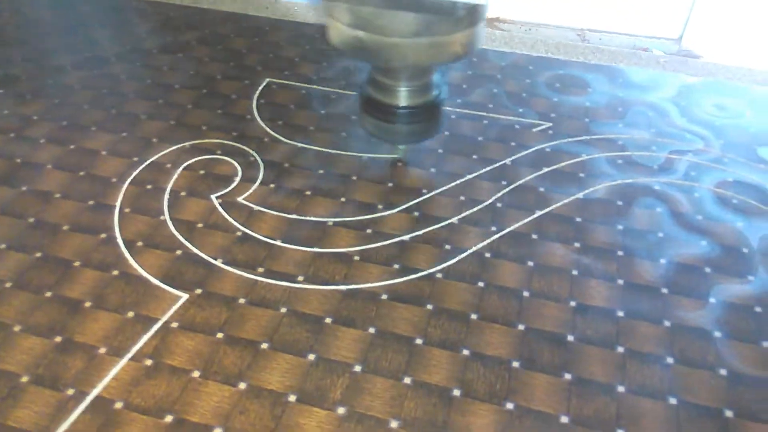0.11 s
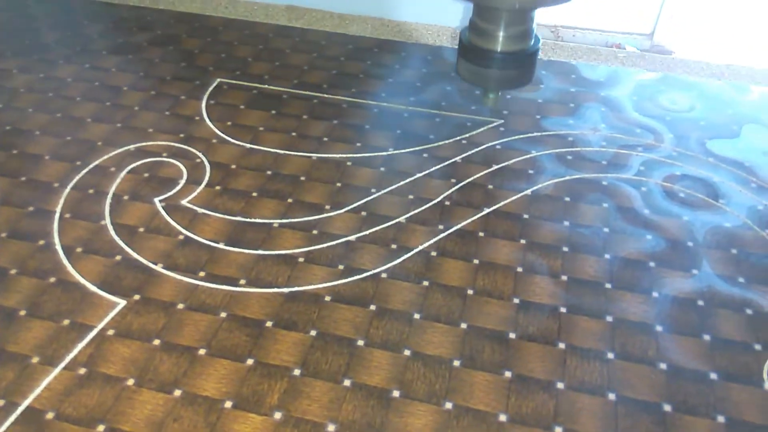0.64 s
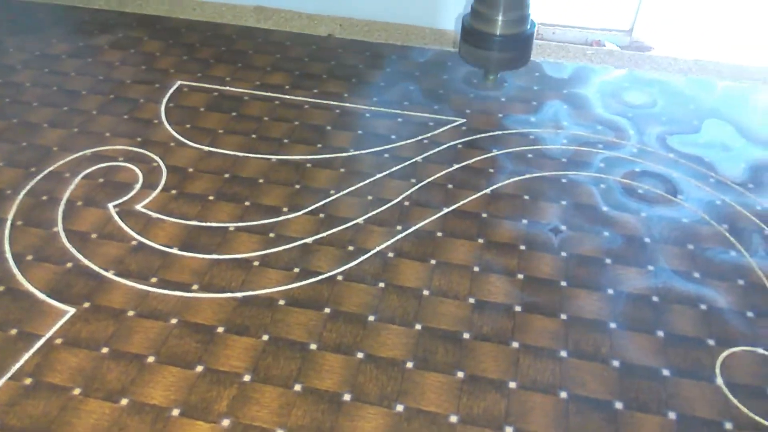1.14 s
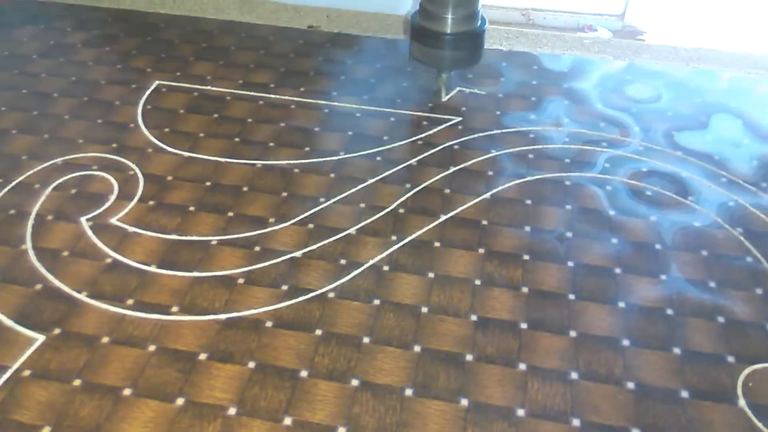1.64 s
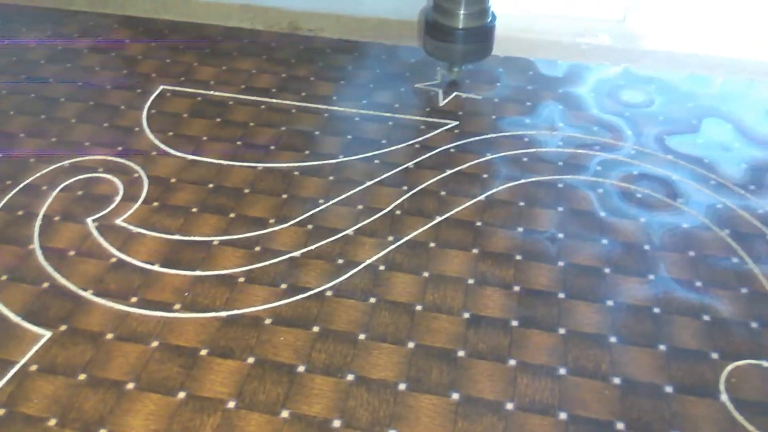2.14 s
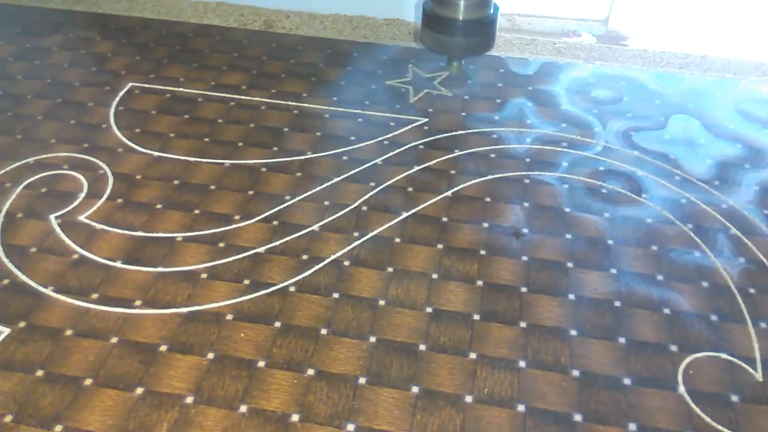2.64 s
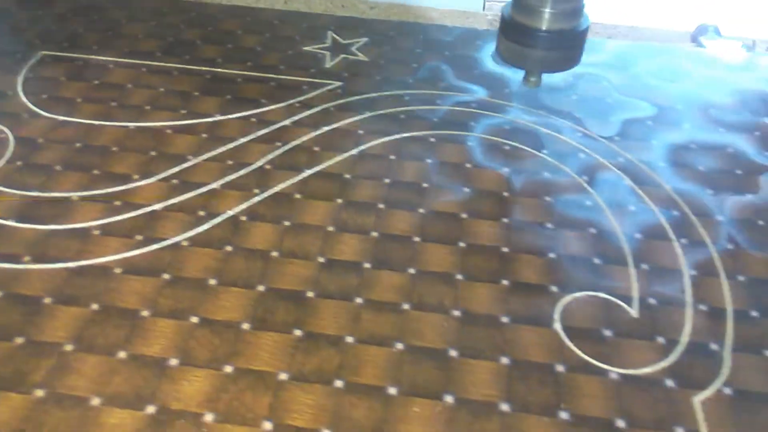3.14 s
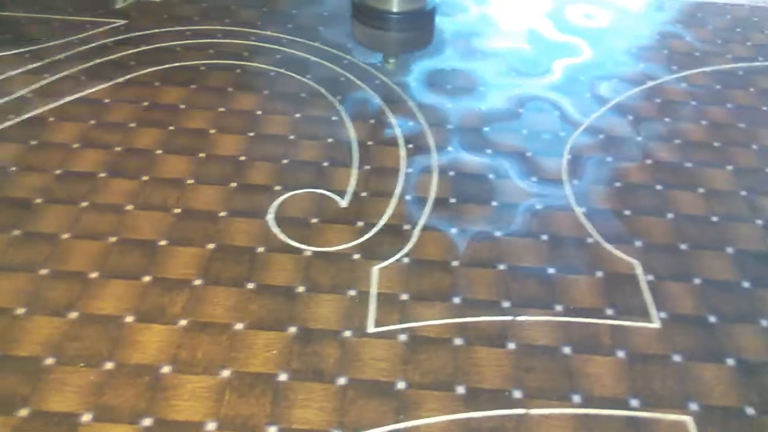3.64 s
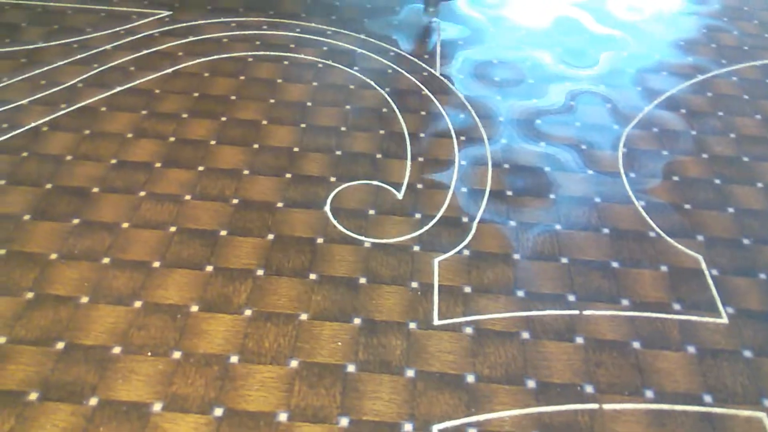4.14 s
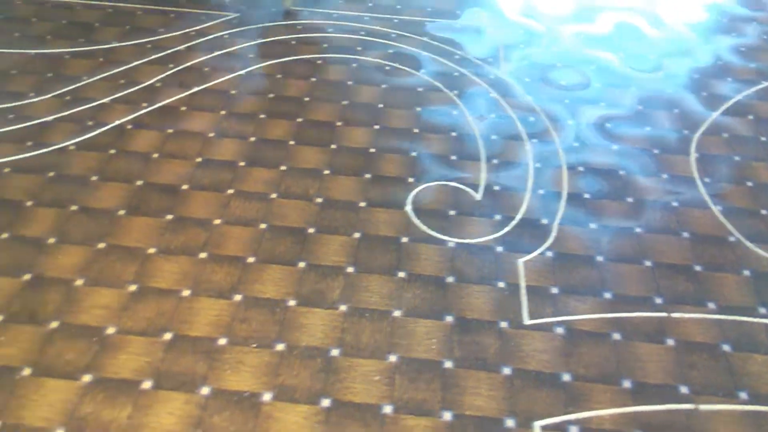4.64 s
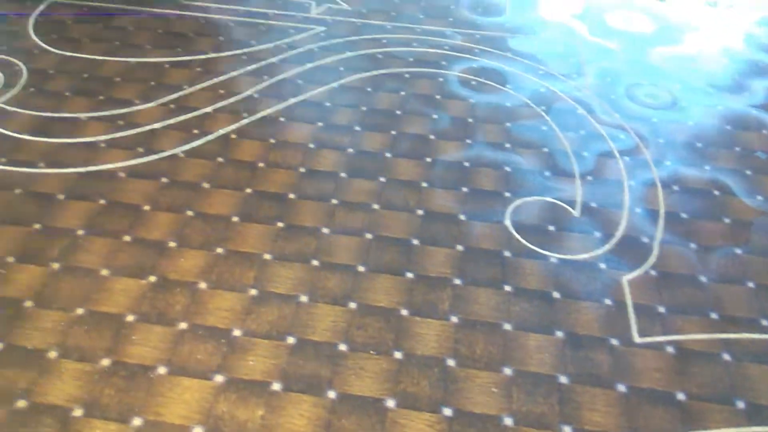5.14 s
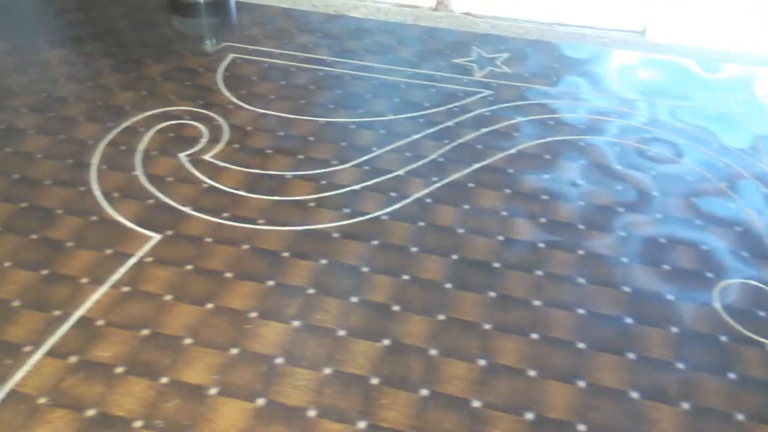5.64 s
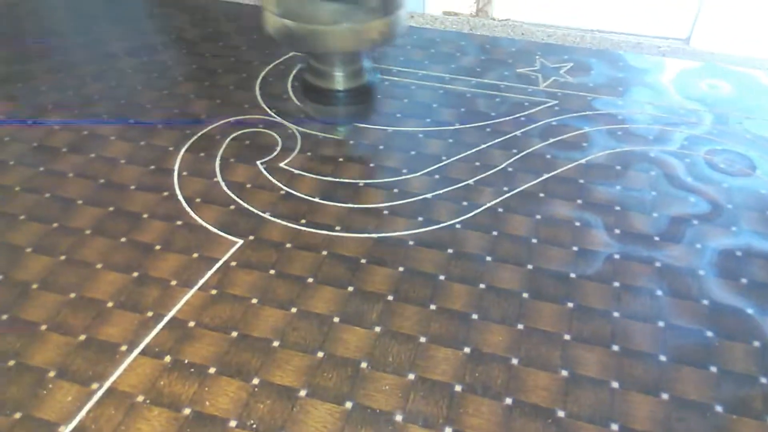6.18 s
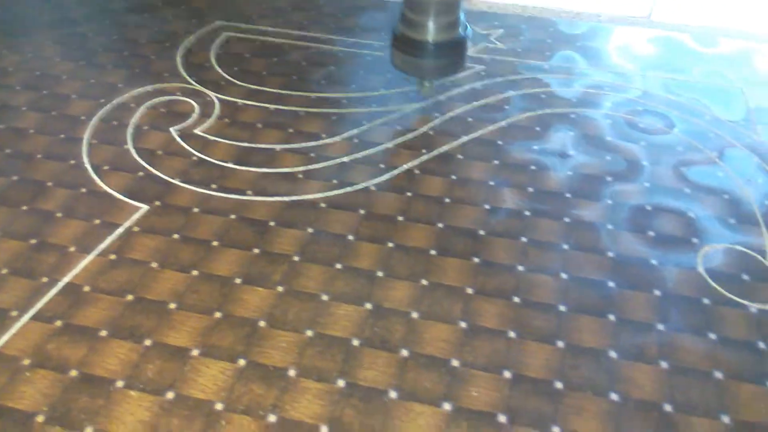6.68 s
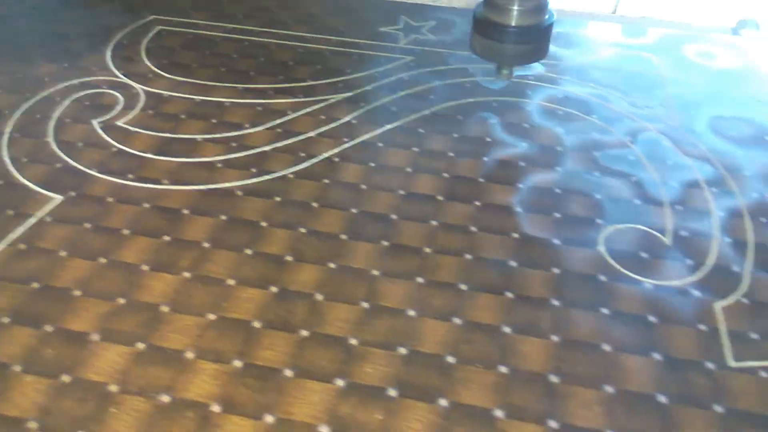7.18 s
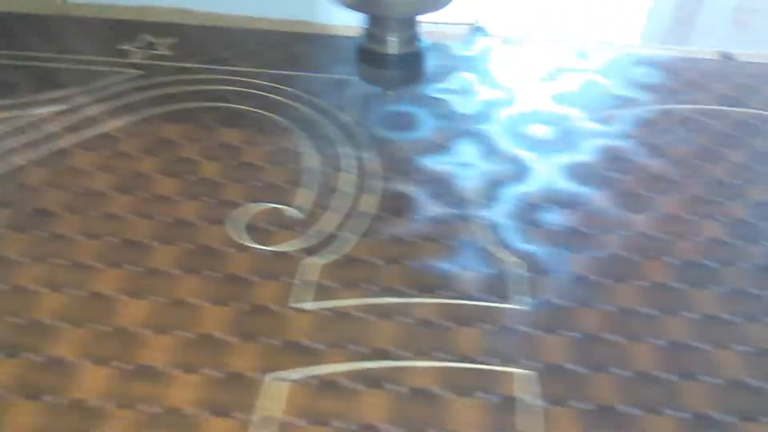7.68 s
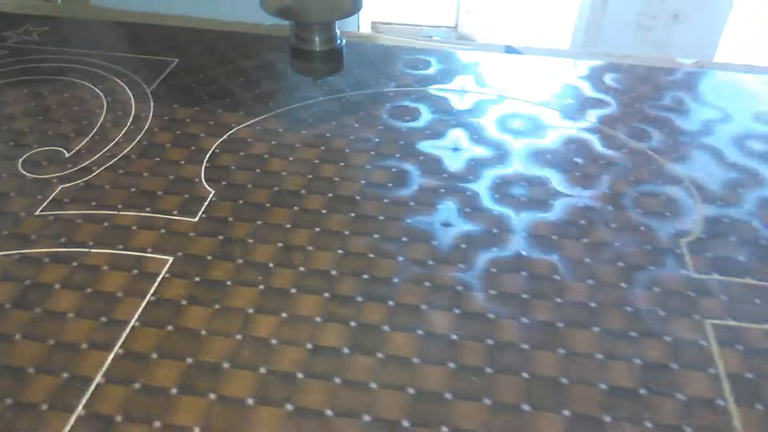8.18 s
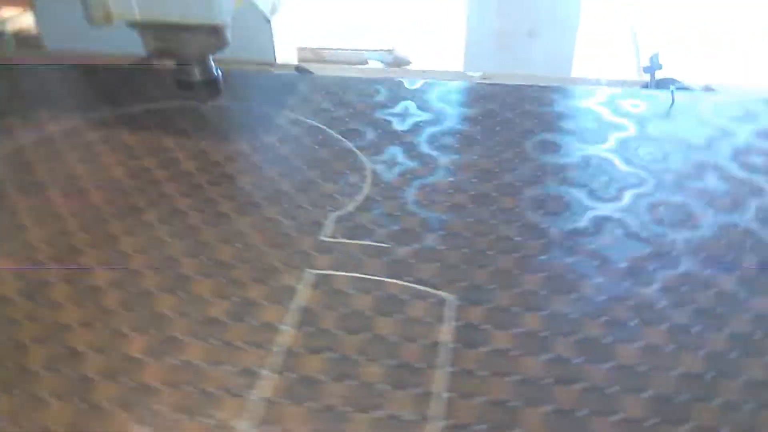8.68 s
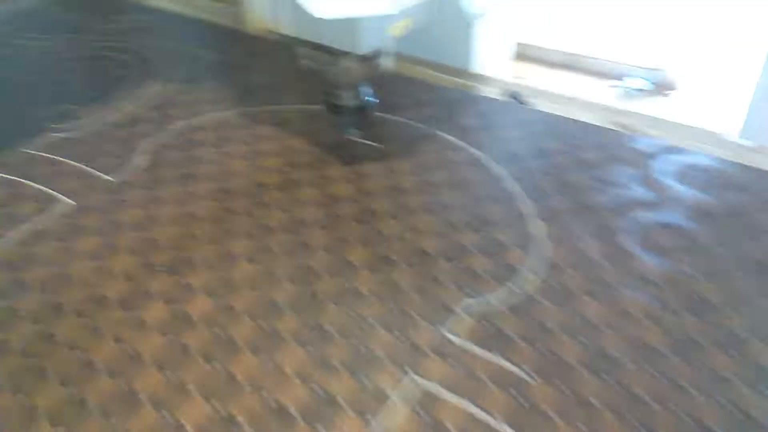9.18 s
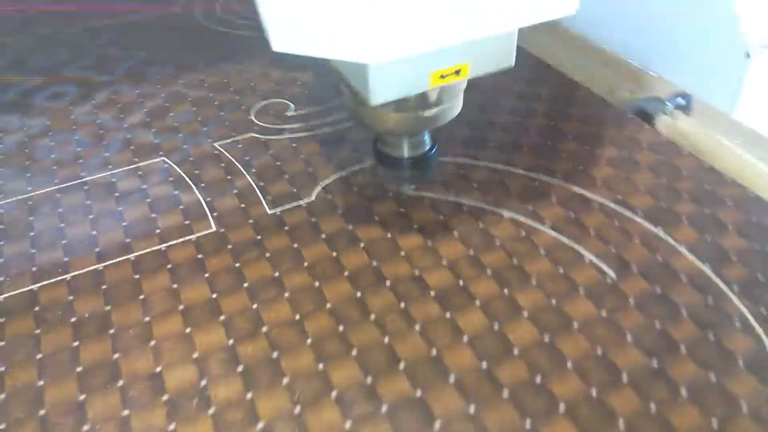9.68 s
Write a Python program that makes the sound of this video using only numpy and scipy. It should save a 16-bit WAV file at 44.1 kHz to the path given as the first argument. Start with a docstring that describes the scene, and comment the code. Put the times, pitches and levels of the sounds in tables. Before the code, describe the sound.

Close to a machine router in a workshop, a broad, bright hiss of rushing air dominates without pause. A thin, steady spindle whine pierces it at constant pitch, its overtones swelling and fading. Soon the whine throbs in quick short strokes, then smooths out. Feed motors hum softly underneath. The hiss changes colour as the head and handheld microphone move, with short early reflections and no long echo.

```python
"""A router spindle whines through a broad hiss as it cuts shallow grooves into a board in a workshop.
The whine sums sines on multiples of one rotation; short strokes of the cutter make its second multiple throb.
Air rushing round the cutter is noise shaped by the resonances of the head, and its colour shifts as head and
microphone move about. Feed motors hum as narrow-band noise; a low fan tone and a rumble lie beneath."""
import sys
import numpy as np
from scipy import signal
from scipy.fft import rfft, irfft
from scipy.io import wavfile
from scipy.ndimage import map_coordinates

SR = 44100
rng = np.random.default_rng(int(sys.argv[2]) if len(sys.argv) > 2 else 0)


def gain_from_db(level_db):
    """Turn a decibel level (scalar or array-like) into a linear amplitude factor."""
    decades = np.asarray(level_db, float) / 20
    return 10 ** decades


def master(y):
    """Save y as 16-bit WAV."""
    cut = np.clip(np.atleast_2d(y).T, -1, 1)
    pcm = np.round(cut * 32767)  # scale
    wavfile.write(sys.argv[1], SR, pcm.astype(np.int16))


N = 432606
TIME = np.arange(N) / SR  # s
FREQS = np.fft.rfftfreq(N, 1 / SR) + 1e-3  # Hz, kept above zero for the logarithm

# Colour of the workshop rumble, relative within a band: [pitch_hz, density_db_per_hz]
RUMBLE_COLOUR = [(12, -60), (20, -27), (97, -27), (154, -13), (198, -13.5), (251, -8.5), (318, -9.5),
                 (577, -7), (669, -5), (700, -4.5), (910, -44), (1540, -120)]
# Borders between rumble bands: [pitch_hz]
RUMBLE_BORDERS = [102]
# Rumble bands, low to high: [mean_level_db, turning_share (ratio), drawing_off_share (ratio)]
RUMBLE_LEVELS = [(-67.5, -.3, 1.1), (-43, 0.05, 1)]
# Stretches where the fan hum is heard: [start_s, end_s, level_db]
FAN_STRETCHES = [(-.1, .75, -53), (1.5, 2.15, -57), (2.45, 2.73, -51), (3.7, 3.8, -54), (4.0, 6.4, -54),
                 (6.65, 6.85, -51), (7.2, 7.65, -61), (7.92, 8.35, -54), (8.35, 8.7, -48.5),
                 (9.1, 9.75, -52.5)]
# Feed motor tones: [start_s, end_s, pitch_hz, width_hz, level_db]
FEED_TONES = [(.78, .96, 685, 8, -39), (.95, 1.3, 150, 16, -57.5), (0.92, 1.3, 330, 43, -46.5),
              (2.55, 2.75, 310, 55, -45), (2.8, 3.3, 680, 2, -42.5), (3.45, 3.85, 350.4, 35, -45.5),
              (3.496, 3.9, 587, 3, -43), (4.297, 5.1, 159, 23, -51.5), (5.1, 6, 159, 35, -53),
              (6.65, 6.85, 320, 60, -49), (2, 2.63, 145, 28, -59.5), (8.65, 8.9, 163, 20, -53),
              (8.647, 8.9, 355, 15, -49), (8.695, 9.098, 423, 47, -43), (9.1, 9.798, 171, 23, -51),
              (3.45, 3.85, 155, 30, -55), (5.1, 5.5, 360, 80, -49.5), (6.0, 7.1, 80, 50, -67)]
# Colour of the roar of head and board, relative within a band: [pitch_hz, density_db_per_hz]
ROAR_COLOUR = [(350, -55), (600, -13), (685, -14), (743, -4.5), (848, -3.5), (1020, 0), (1350, -5),
               (1740, -2.5), (2050, -8.5), (2320, -7.5), (2730, -9), (3050, -1), (4720, -4), (5720, -5),
               (6800, -8.5), (8840, -48), (15000, -120)]
# Resonances and dips of the roar: [pitch_hz, width_hz, lift_db]
ROAR_RESONANCES = [(970, 420, -1), (1748, 110, 4), (2290, 180, 2.5), (3000, 240, 0.5), (3850, 150, 1.5),
                   (4994, 57, 5.5), (5730, 570, 7.5)]
# Borders between roar bands: [pitch_hz]
ROAR_BORDERS = [1510, 2640]
# Roar bands, low to high: [mean_level_db, turning_share (ratio), drawing_off_share (ratio)]
ROAR_LEVELS = [(-35, 0.068, 0.09), (-30.5, -0.046, .1), (-26, -0.17, 0.24)]
# Colour of the air hiss at the cutter, relative within a band: [pitch_hz, density_db_per_hz]
HISS_COLOUR = [(3880, -30), (6600, -4), (6760, -11.5), (7360, 4), (7780, 4), (9770, 6.5), (10600, -0.5),
               (11900, -0.5), (12900, -7.5), (14600, -9), (15300, -9)]
# Resonances and dips of the hiss: [pitch_hz, width_hz, lift_db]
HISS_RESONANCES = [(7140, 450, 6), (8420, 170, 2), (8780, 310, 2.5), (10060, 230, 7), (11580, 300, -0.5),
                   (14600, 300, 1.5), (6670, 310, -6), (12000, 330, 0)]
# Borders between hiss bands: [pitch_hz]
HISS_BORDERS = [8460, 9510, 10660, 12470]
# Hiss bands, low to high: [mean_level_db, turning_share (ratio), drawing_off_share (ratio)]
HISS_LEVELS = [(-29, 0.4, 0.18), (-28.5, -0.054, 0.68), (-28, -0.47, 1.05), (-26.5, -0.16, 0.5),
               (-22, .99, .05)]
# The head turns its air stream to and from the microphone, and draws off; only departures from
# each column's mean count: [time_s, hiss_top_db, whole_rush_db]
HEAD_BEARING = [(0.0, -26, -18), (0.98, -22.5, -18.5), (1.06, -23.5, -18), (1.23, -24.5, -18.5),
                (1.94, -26.5, -18), (1.99, -27, -17.5), (3.22, -21.5, -19.5), (3.96, -26.5, -17),
                (4.51, -31.5, -18.5), (5.93, -28.5, -19.5), (6.39, -25.5, -17.5), (6.69, -23.5, -18.5),
                (7.38, -23.5, -19.5), (8.44, -27.5, -20.5), (8.58, -25.5, -20), (8.88, -30, -19.5),
                (9.4, -26.5, -21), (9.81, -26, -22)]
# Narrow bands of air that swell for a while (silent if they end before they start):
# [start_s, end_s, pitch_hz, width_hz, level_db]
AIR_SWELLS = [(-2, 0.38, 3800, 160, -34), (0, 1.2, 5000, 130, -37), (3, 3.6, 4600, 130, -39),
              (4.5, 6, 3400, 400, -35.5), (5.5, 6.5, 3790, 53, -37.5), (6.5, 8.7, 5030, 110, -37),
              (8, 9, 6200, 150, -36), (9, 9.6, 3470, 200, -36), (5, 7.2, 1750, 80, -37),
              (9, 10.1, 1300, 110, -37.5), (5, 5.5, 13000, 300, -39), (5, 6.8, 8150, 140, -34),
              (4.7, 6, 9100, 400, -40), (2, 6.1, 9500, 200, -35.5), (2, 1.2, 12000, 300, -36),
              (5, 5.2, 7250, 180, -32.5), (4.5, 6.1, 11200, 1000, -28), (1.5, 3.45, 11200, 900, -29),
              (6.2, 6.8, 10000, 500, -29), (7.5, 8.2, 1060, 110, -40), (0, 0.59, 12000, 540, -36),
              (1.0, 2.63, 9950, 480, -30), (1, 3.0, 8250, 400, -32), (3.5, 4.8, 8900, 600, -29.5),
              (7.5, 8.6, 7300, 500, -33), (8, 11, 13000, 900, -29), (7, 8.7, 4300, 400, -36.5),
              (3.5, 4.8, 14700, 1500, -33), (3.9, 5.0, 11000, 700, -35), (8, 7.6, 5000, 60, -42),
              (3.3, 3.95, 3870, 40, -44)]
# Reflections off board and gantry, relative to the direct path: [delay_s, level_db]
REFLECTIONS = [(.0017, -17), (.0029, -16), (.0043, -15), (.0061, -16), (.0087, -16), (.0127, -16)]
# Lowest tone of the whine as head and microphone move: [time_s, level_db]
FUNDAMENTAL_LEVEL = [(0.0, -32.5), (0.41, -37), (0.74, -34.5), (0.87, -43), (1.23, -35.5), (1.5, -42.5),
                     (1.86, -39.5), (1.88, -50), (1.99, -39), (2.08, -53), (2.7, -38.5), (2.79, -45),
                     (3.22, -35), (3.77, -35.5), (4.12, -43.5), (5.22, -35), (5.68, -42), (5.85, -33),
                     (6.23, -32.5), (6.45, -35.5), (8.44, -35), (8.63, -44), (9.07, -42), (9.1, -50),
                     (9.29, -35), (9.81, -35.5)]
# Higher tones of the whine: [multiple_of_rotation (ratio)]
WHINE_MULTIPLES = [2, 3, 4, 5, 6, 8, 16]
# Each higher multiple between its swells: [level_db]
FAINT_LEVELS = [-49, -54, -55, -58, -51, -54, -41]
# Stretches where a multiple stands out, one list per multiple: [start_s, end_s, level_db]
MULTIPLE_SWELLS = [
    [(-.1, .5, -32.5), (.56, 1.3, -36), (1.3, 2.5, -41), (2.5, 3.75, -37.5), (3.815, 4.11, -28),
     (4.17, 4.45, -28), (4.45, 5.3, -30.5), (5.3, 5.53, -36), (5.59, 6.07, -35), (6.2, 6.63, -34),
     (7.52, 7.75, -35.5), (7.75, 8.0, -44), (8.38, 8.67, -38.5), (9.1, 9.9, -36.5)],
    [(.2, .55, -37.5), (1.35, 1.5, -42), (1.7, 2.5, -47), (5.02, 5.4, -37.5), (5.4, 5.6, -34.5),
     (5.66, 5.95, -36.5), (6.4, 6.65, -39), (6.9, 7.2, -46)],
    [(-.1, .4, -41), (1.5, 2.45, -41), (3.8, 4.55, -41.5), (4.55, 4.9, -35.5), (4.9, 5.65, -39),
     (6.0, 6.65, -43), (9.05, 9.4, -45), (9.45, 9.68, -37), (9.68, 9.9, -42)],
    [(-.1, .55, -45), (2.15, 2.45, -45), (3.76, 4.06, -41), (5.0, 5.7, -45), (6.01, 6.3, -39),
     (6.5, 7.1, -52), (7.6, 7.75, -46)],
    [(-.1, .25, -44), (1.25, 2.4, -56), (2.8, 3.1, -47), (3.9, 5.62, -41.5), (5.63, 5.78, -35),
     (6.1, 6.45, -41), (9.05, 9.35, -41), (9.55, 9.9, -51)],
    [(3.45, 3.75, -49), (4.4, 5.2, -45), (8.7, 9.3, -47)],
    [(-.1, .25, -38), (1.4, 2.45, -42), (2.88, 3.42, -32), (4.3, 4.95, -39), (4.95, 5.27, -29.5),
     (5.33, 5.6, -31), (5.6, 6.3, -44), (6.5, 6.88, -36), (7.15, 7.72, -38), (7.8, 8.1, -33),
     (8.55, 8.92, -38), (9.07, 9.33, -35), (9.4, 9.7, -35), (9.7, 9.9, -28)],
]
# Strokes of the cutter in the second multiple: [start_s, length_s, peak_level_db]
CUTTER_STROKES = [(1.31, 0.14, -27), (1.445, .13, -23.5), (1.577, 0.14, -24.5), (1.70, 0.1, -24.5),
                  (1.8, 0.13, -27), (1.928, 0.14, -24.5), (2.048, .125, -26), (2.18, .11, -34.5),
                  (2.298, 0.12, -22.5), (2.435, 0.071, -27), (3.997, 0.28, -36), (4.133, 0.23, -32),
                  (5.6, .14, -30), (5.798, 0.073, -34), (5.994, .09, -28), (9.548, .2, -36)]


def rms_one(x):
    """Normalisation: scales to rms 1."""
    return x / np.sqrt(np.mean(x ** 2) + 1e-20)


def in_time(rows):
    """Linear interpolation: joins table rows by straight lines, one array per column."""
    time_s, *columns = np.transpose(rows)
    return [np.interp(TIME, time_s, column) for column in columns]


def drift(rate):
    """Slow random motion: normal knots of spread 1, rate per second, joined by straight lines."""
    knots = rng.standard_normal(400)
    return np.interp(TIME * rate, np.arange(len(knots)), knots)


def gate(start, end, fade_s):
    """Linear envelope: 1 between start and end, with straight fades centred on both."""
    return np.clip(np.minimum(TIME - start, end - TIME) / fade_s + .5, 0, 1)


def stretches(rows, fade_s):
    """Superposed envelopes: the height of a tone that stands out for a while in each row."""
    return sum(gain_from_db(level_db) * gate(start, end, fade_s) for start, end, level_db in rows)


def bell(hz, width_hz):
    """Resonance curve, 1 on top and one half at the edges of its width."""
    return 1 / (1 + (2 * (FREQS - hz) / width_hz) ** 2)


def hums(rows, fade_s):
    """Resonant filtering: narrow noise round each pitch, faded in and out."""
    out = np.zeros(N)
    white = rfft(rng.standard_normal(N))
    for start, end, hz, width_hz, level_db in rows:
        narrow = rms_one(irfft(white * bell(hz, width_hz), N))
        out += gain_from_db(level_db) * gate(start, end, fade_s) * narrow
    return out


def band_levels(bands, wander_db):
    """Directivity: each band follows the bearing of the head by its own shares and wanders slowly."""
    turn_db, off_db = (column - column.mean() for column in in_time(HEAD_BEARING))
    return [mean_db + turn_share * turn_db + off_share * off_db + wander_db * drift(2.493)
            for mean_db, turn_share, off_share in bands]


def rush(colour, resonances, borders_hz, levels_db, blend_hz, flicker_db):
    """Coloured noise: neighbouring bands of one spectrum swell and fade separately."""
    hz, db = np.transpose(colour)
    colour_db = np.interp(np.log(FREQS), np.log(hz), db, left=-120)
    for peak_hz, width_hz, lift_db in resonances:
        colour_db = colour_db + lift_db * bell(peak_hz, width_hz)
    noise = rfft(rng.standard_normal(N)) * gain_from_db(colour_db)
    # each band is the difference of two smooth steps in frequency
    above = [1] + [.5 + .5 * np.tanh((FREQS - border) / blend_hz) for border in borders_hz] + [0]
    out = np.zeros(N)
    for low, high, level_db in zip(above, above[1:], levels_db):
        band = rms_one(irfft(noise * (low - high), N))
        out += gain_from_db(level_db + flicker_db * drift(12)) * band
    return out


def workshop_rumble():
    """Low coloured noise: two bands whose levels vary apart."""
    levels_db = band_levels(RUMBLE_LEVELS, wander_db=1.35)
    return rush(RUMBLE_COLOUR, [], RUMBLE_BORDERS, levels_db, blend_hz=22, flicker_db=1.26)


def fan_hum():
    """Phase modulation: a low sine made slightly unsteady in phase and level."""
    pitch_hz, faint_db, waver_db = 246.5, -68, 3.0
    height = gain_from_db(faint_db) + stretches(FAN_STRETCHES, fade_s=.1)
    height = height * gain_from_db(waver_db * drift(12))
    return height * np.sqrt(2) * np.sin(2 * np.pi * pitch_hz * TIME + 1.7 * drift(11))


def feed_motors():
    """Forced resonance: each move of the gantry sets a frame resonance humming."""
    return hums(FEED_TONES, fade_s=0.11)


def head_roar():
    """Resonant noise: the roar of head and board in three bands."""
    levels_db = band_levels(ROAR_LEVELS, wander_db=0.8)
    return rush(ROAR_COLOUR, ROAR_RESONANCES, ROAR_BORDERS, levels_db, blend_hz=150, flicker_db=0.5)


def cutter_hiss():
    """Flow noise: air rushing round the cutter hisses through resonances in five bands."""
    levels_db = band_levels(HISS_LEVELS, wander_db=0.8)
    return rush(HISS_COLOUR, HISS_RESONANCES, HISS_BORDERS, levels_db, blend_hz=250, flicker_db=0.63)


def reflected(x):
    """Comb filtering: paths of slowly changing length lay drifting ripples over the spectrum."""
    wander_s, wander_rate = .00012, .7  # spread of each delay; knots per second
    out, power = x.copy(), 1
    for delay_s, level_db in REFLECTIONS:
        lag_s = delay_s + wander_s * drift(wander_rate)
        out += gain_from_db(level_db) * map_coordinates(x, [(TIME - lag_s) * SR], order=3, mode="mirror")
        power += gain_from_db(level_db) ** 2
    return out / np.sqrt(power)  # about as loud as the direct sound alone


def rushing_air():
    """Superposition: reflected roar and hiss, with narrow resonant swells added."""
    return reflected(head_roar() + cutter_hiss()) + hums(AIR_SWELLS, fade_s=0.23)


def stroke(start, length):
    """Half-sine envelope with warped time: a quick rise and a slower fall, round on top."""
    rise_share = 0.3
    return np.sin(np.pi * np.interp((TIME - start) / length, [0, rise_share, 1], [0, .5, 1]))


def spindle():
    """Harmonic synthesis: multiples of one rotation waver as room paths change; high ones blur most."""
    rotation_hz, wander_hz = 749.25, .1
    blur_rad, fast_blur_rad = .07, .0028  # grow with the multiple and with its square
    faint_waver_db = 2
    phase = 2 * np.pi * np.cumsum(rotation_hz + wander_hz * drift(2.04)) / SR
    fundamental_db = in_time(FUNDAMENTAL_LEVEL)[0] + 0.82 * drift(9)
    out = gain_from_db(fundamental_db) * np.sin(phase + 0.16 * drift(4.8))

    heights = [gain_from_db(faint_db + faint_waver_db * drift(6)) + stretches(rows, fade_s=.05)
               for faint_db, rows in zip(FAINT_LEVELS, MULTIPLE_SWELLS)]
    # the first of the higher tones is the second multiple, which throbs
    throb = sum(gain_from_db(peak_db) * stroke(start, length) for start, length, peak_db in CUTTER_STROKES)
    heights[0] = heights[0] + throb

    for k, height in zip(WHINE_MULTIPLES, heights):
        blur = blur_rad * k * drift(9) + fast_blur_rad * k * k * drift(30)
        waver = gain_from_db((.8 + 0.12 * k) * drift(11))
        out += height * waver * np.sin(k * phase + blur)
    return np.sqrt(2) * out  # levels above are rms


def scene():
    """Superposition: all sources reach one microphone, heard alike in both channels."""
    background = workshop_rumble() + fan_hum() + feed_motors()
    return np.tile(background + rushing_air() + spindle(), (2, 1))


def opposed_treble_noise(x, per_s, length_s, level_db):
    """Phase randomisation: short treble slices turn to noise, opposite in sign in the two channels."""
    side, span = np.zeros(N), round(length_s * SR)
    window, hz = np.hanning(span), np.fft.rfftfreq(span, 1 / SR)
    for when, where, wide in rng.random((round(per_s * N / SR), 3)):
        i = int(when * (N - span))
        low_hz = 4200 + 9300 * where ** 1.2
        high_hz = low_hz + 1100 + 700 * wide
        sizes = np.abs(rfft(x[i:i + span])) * (hz > low_hz) * (hz < high_hz)
        random_turn = np.exp(2j * np.pi * rng.random(len(hz)))
        side[i:i + span] += gain_from_db(level_db) * window * irfft(sizes * random_turn, span)
    return side * np.array([[1], [-1]])


def roll_off(x):
    """The treble ends steeply here."""
    return signal.sosfilt(signal.butter(12, 15420, fs=SR, output="sos"), x)


def record(dry):
    """Superposition: random treble noise of opposite sign is added to the two equal channels."""
    mix = dry + opposed_treble_noise(dry[0], per_s=9, length_s=.046, level_db=-0.5)
    return roll_off(mix)


dry = scene()
out = record(dry)
master(out)
```